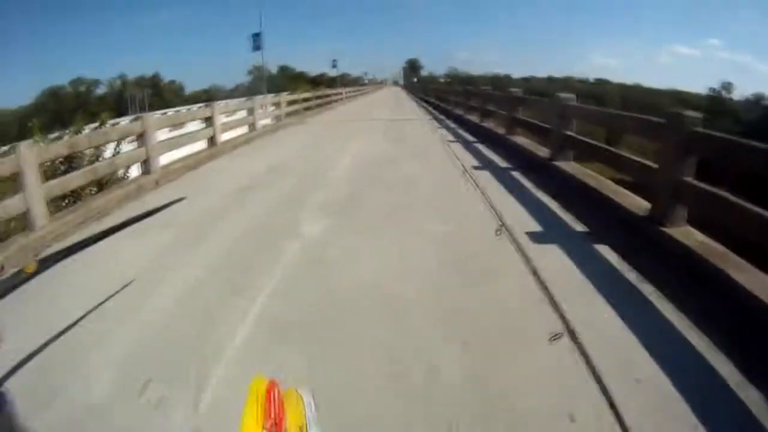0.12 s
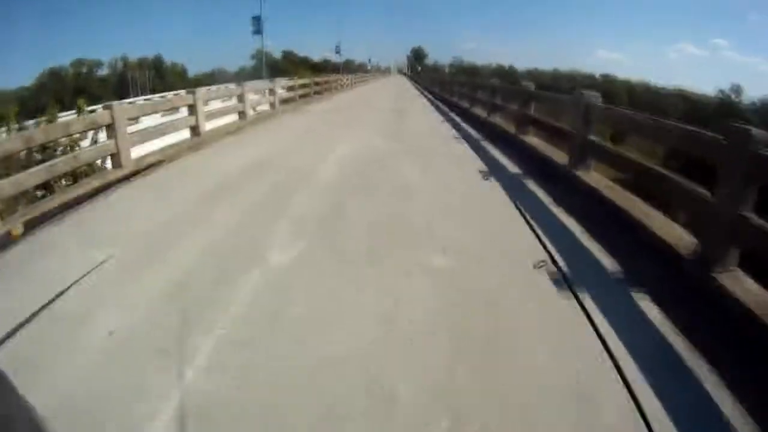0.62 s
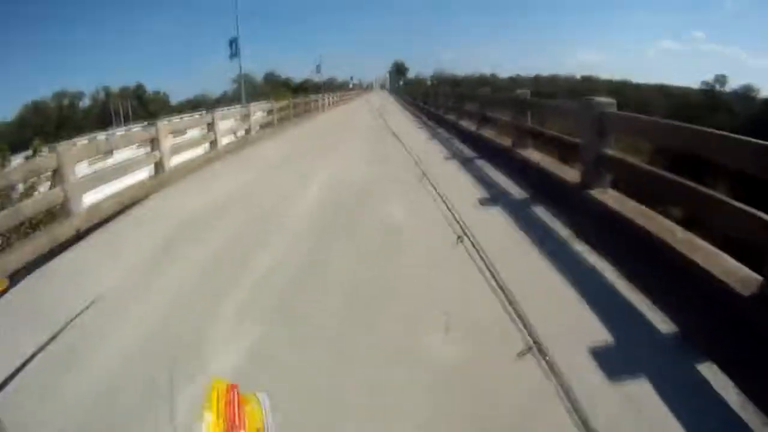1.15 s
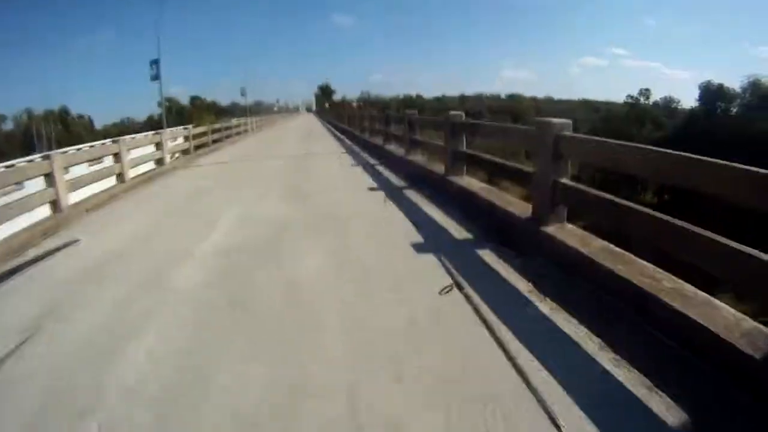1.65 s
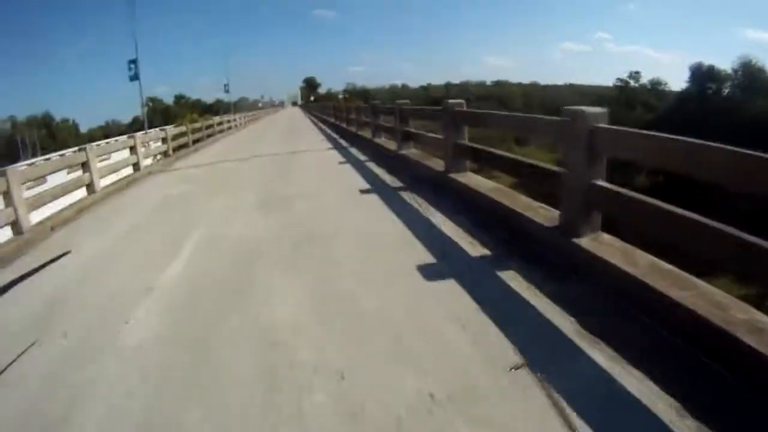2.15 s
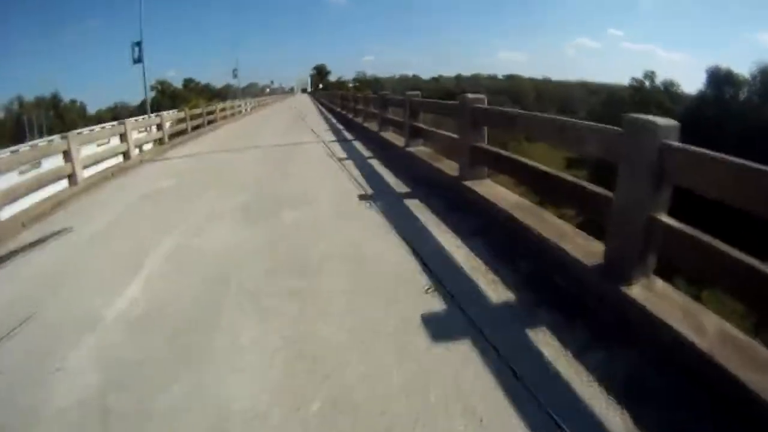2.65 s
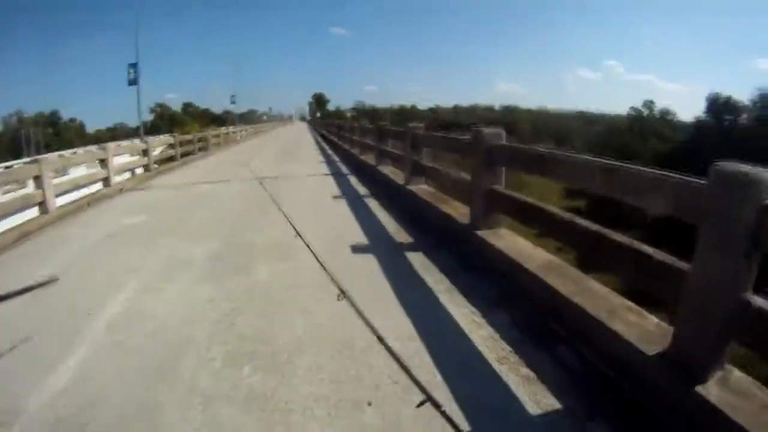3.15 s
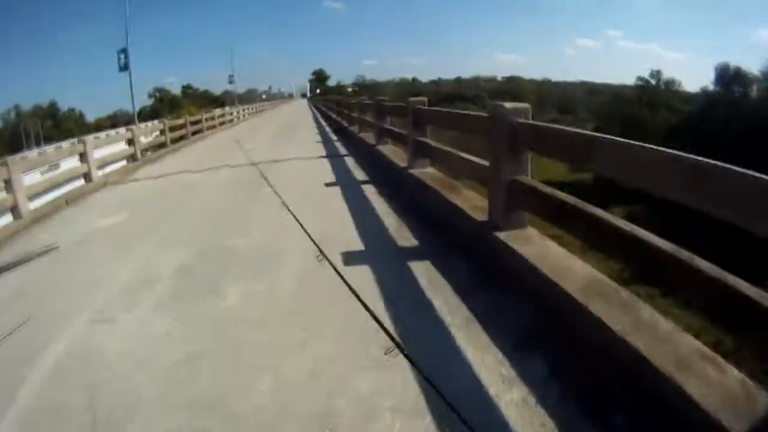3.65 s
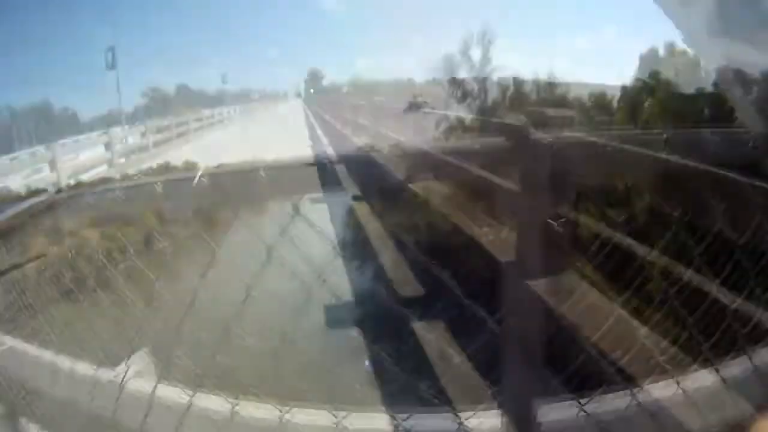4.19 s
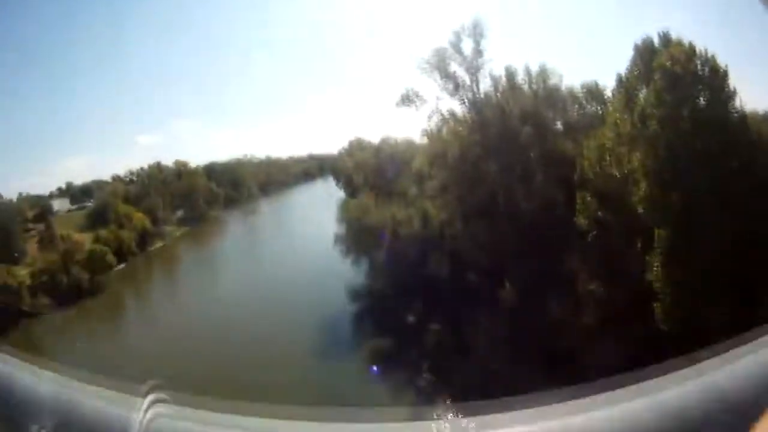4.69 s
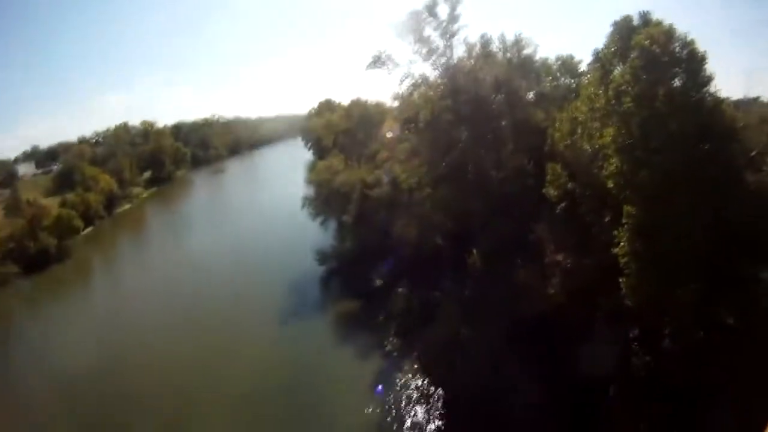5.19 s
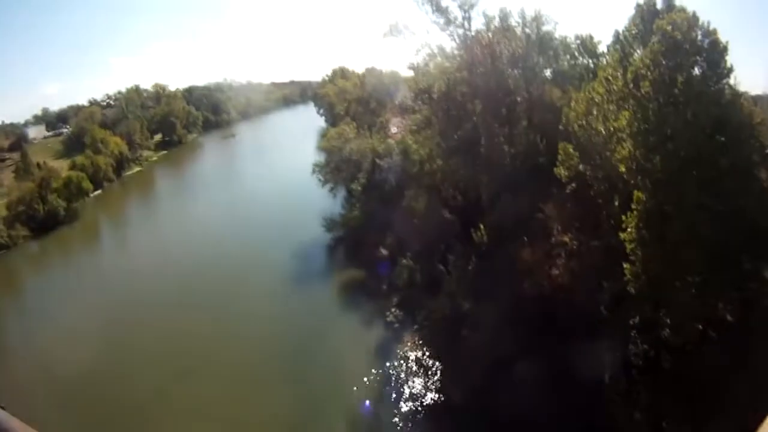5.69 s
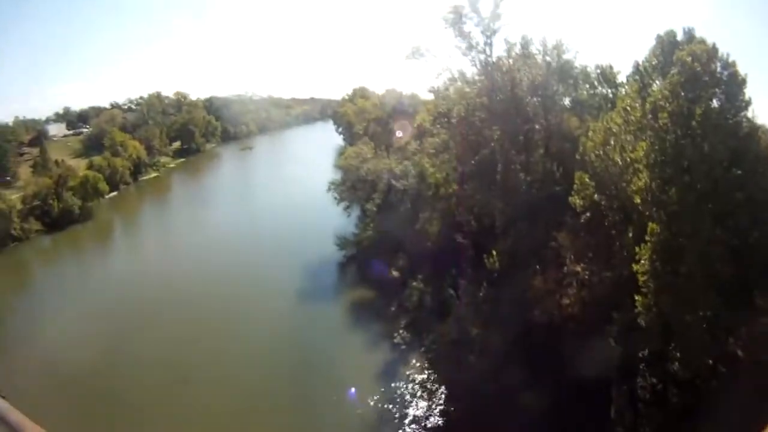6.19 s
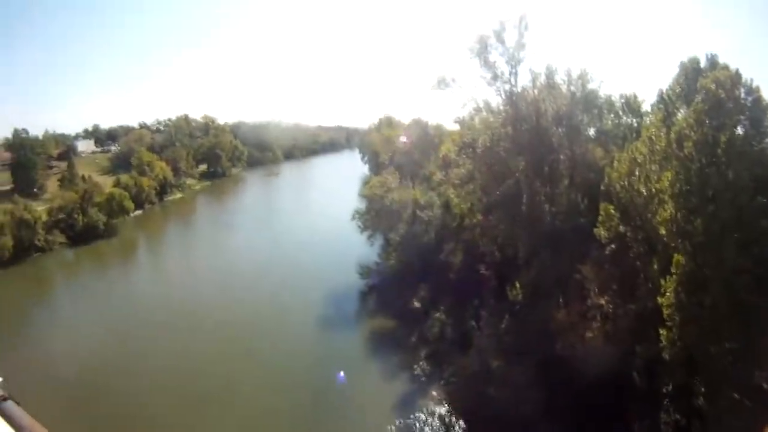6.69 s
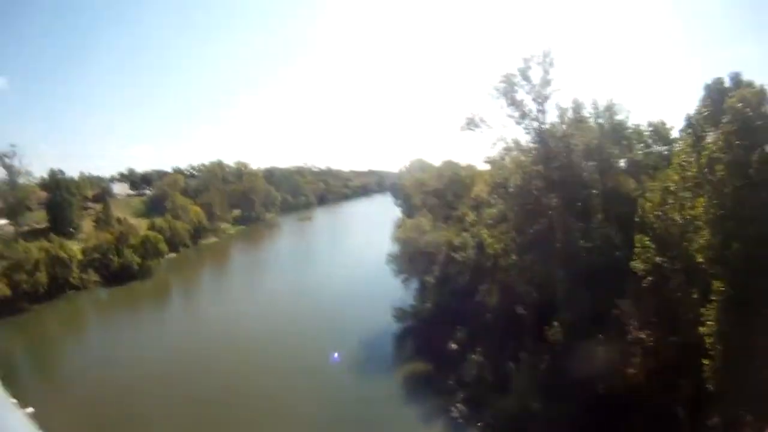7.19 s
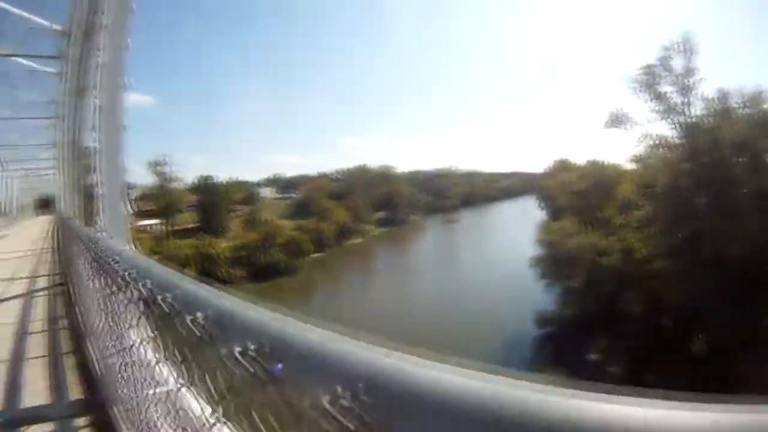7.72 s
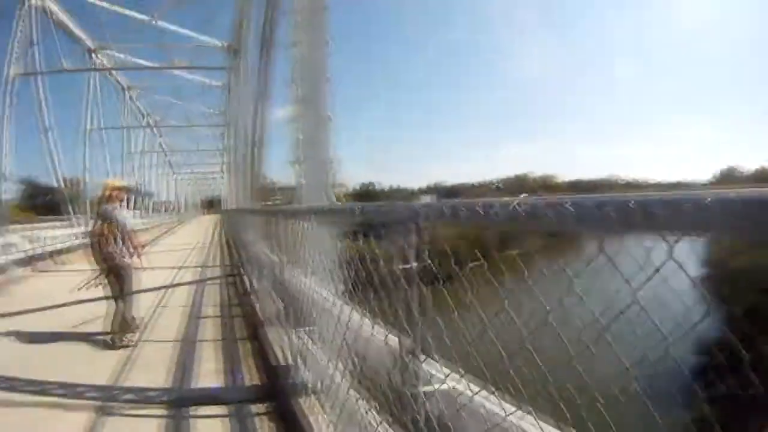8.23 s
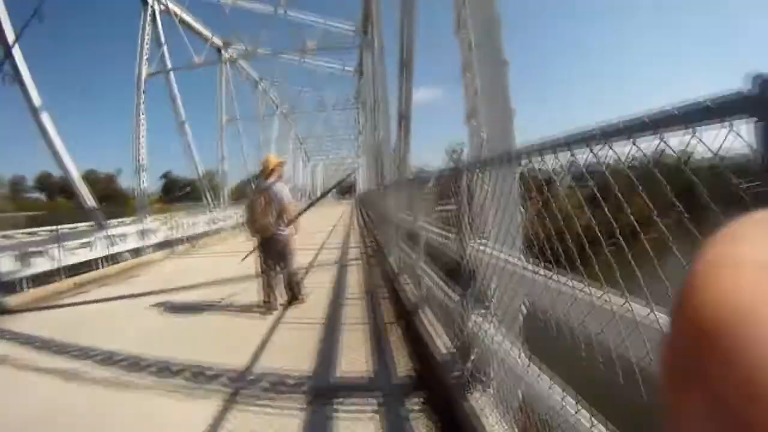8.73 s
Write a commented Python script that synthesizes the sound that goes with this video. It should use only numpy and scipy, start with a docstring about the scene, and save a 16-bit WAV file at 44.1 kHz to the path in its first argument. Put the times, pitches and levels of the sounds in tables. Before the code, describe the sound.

A walker's strap chafes a plastic camera case in short dry strokes, with low thumps about twice a second. A hand then seizes the case: one piercing knock, plastic clicks, creaks and deep rumble. The handling settles to quiet hiss with occasional dull bumps, before fingers and case clatter again at the end. The single microphone is inside the case, so everything is boxy, close and coarse, with little outdoor ambience.

```python
"""A bridge, crossed by a small camera in a sealed plastic case. First it rides on a strap that rubs
in strokes, a few to each step; then it is held by hand: fingers slide, the case creaks and knocks.
Rubbing is stick-slip noise and knocks are short pushes, both filtered by the resonances of the case.
Wind, footfalls and grip rumble in the bass as slowly varying noise, with single jolts as pulses.
The one microphone hears all of it through the case; the recorder samples slowly and holds each value."""
import sys
import numpy as np
from scipy import signal
from scipy.io import wavfile
from scipy.ndimage import uniform_filter1d

SR = 44100
rng = np.random.default_rng(int(sys.argv[2]) if len(sys.argv) > 2 else 0)


def volts(x):
    """Linear amplitude factor 10**(x/20) for a level x in dB, scalar or array-like."""
    e = np.asarray(x, float) / 20
    return 10 ** e


def wrap_up_sound(samples):
    """Save the sound to the file named by the first command line argument, as 16-bit audio."""
    columns = np.atleast_2d(samples).T
    # keep every value between -1 and 1, then stretch to whole-number steps
    tamed = np.clip(columns, -1, 1)
    steps = np.round(tamed * 32767).astype(np.int16)
    wavfile.write(sys.argv[1], SR, steps)


N = 390285

# resonances of the case: (frequency [Hz], width of one filter pass [Hz],
# gain under the strap [dB], gain in the hand [dB], gain when knocked [dB])
CASE_MODES = [(203, 137, -10.5, -7.5, 6), (312, 158, -8.5, -2.5, 7), (414, 180, -7.5, -0.5, 4),
              (557, 140, -1.5, -1, 4), (670.4, 75, -3.5, -0.5, 4.5), (780, 185, -4, -1.5, 0.5),
              (1033, 195, -6, -8.5, -2), (1267, 330, -2.5, -3, 0), (1507, 99, -4.5, -1, 3),
              (1740, 264, 0, -0.5, 2), (2020, 131, 2.5, 1, 7), (2250, 232, 0.5, 3, 4.5),
              (2420, 318, -6.5, -1.5, 3), (2840, 96, -5.5, -21.5, -12.5), (3080, 62, -36, -17.5, -18),
              (3458, 264, -6, -14, -13.5), (3944, 24, -37, -16, -39.5), (4630, 100, -18, -19.5, -21.5),
              (5060, 210, -21, -26.5, -41)]
MODE_HZ, MODE_WIDTH_HZ, STRAP_GAIN_DB, HAND_GAIN_DB, KNOCK_GAIN_DB = np.transpose(CASE_MODES)
LOW_HZ, HIGH_HZ = 1100, 2700  # borders between low, middle and high modes
# resonances of the hollow of the case: (frequency [Hz], width of one filter pass [Hz], gain [dB])
HOLLOW_MODES = [(59.9, 80, -4.5), (81.4, 47, -0.5), (100.5, 22, 3.5), (131.3, 32, -21)]


def ramp(table):
    """Linear interpolation: the columns after the time become curves at every sample."""
    s, *columns = np.transpose(table)
    return [np.interp(np.arange(N) / SR, s, column) for column in columns]


def unit(x):
    """Normalization of the mean power: scaled to rms 1."""
    return x / np.sqrt(np.mean(x ** 2))


def walk(rate):
    """Smoothed random process: levels held 1 / rate s and averaged twice, with a spread near 1."""
    hold = int(SR / rate)
    steps = np.repeat(rng.standard_normal(N // hold + 1), hold)
    slewed = uniform_filter1d(uniform_filter1d(steps, hold), hold)
    return 1.81 * slewed[:N]


def ring(x, hz, width, order=2):
    """Damped resonance: a second pass keeps the valleys between modes dark."""
    b, a = signal.iirpeak(hz, hz / width, fs=SR)
    for _ in range(order):
        x = signal.lfilter(b, a, x)
    return x


def case(push, gains_db, order=2, below_hz=np.inf):
    """Modal superposition: the case answers a push in three groups of modes: low, middle, high."""
    groups = np.zeros((3, len(push)))
    for k, (hz, width, db) in enumerate(zip(MODE_HZ, MODE_WIDTH_HZ, gains_db)):
        if hz < below_hz:
            group = int(hz > LOW_HZ) + int(hz > HIGH_HZ)
            # after a single pass, alternating signs let neighbours add up between their peaks
            sign = (-1) ** (k * order)
            groups[group] += sign * volts(db) * ring(push, hz, width, order=order)
    return groups


def friction(slips, spread, flicker_db):
    """Stick-slip: a flickering hiss with sparse slips (slips per second) of uneven size on top."""
    where, size, hiss = rng.random(N), rng.exponential(size=N), rng.standard_normal(N)
    slip_size = 8.0 * volts(spread * np.minimum(size, 3.0))
    slip = (where < slips / SR) * np.sign(hiss) * slip_size
    return volts(flicker_db * walk(60)) * (hiss + slip)


def strap(share):
    """Sliding friction: the strap creeps over the case all the time and drags hard in short strokes."""
    # strap lying on the case between strokes: (time [s], pressure as level of the middle modes [dB])
    creep_levels = [(0.0, -47.5), (0.4, -54), (1.05, -51.5), (1.27, -58), (1.97, -52.5), (2.4, -56),
                    (2.97, -47.5), (3.25, -56), (3.76, -56.5), (4.11, -41.5), (4.35, -46.5), (5.11, -45),
                    (5.7, -59)]
    # strokes of the strap, a few to each step: (time [s], length [ms], level of the middle modes [dB])
    strokes = [(0.081, 66, -48.5), (0.219, 18, -40.5), (0.284, 110, -42), (0.419, 64, -41),
               (0.495, 46, -49), (0.6, 27, -47), (0.635, 51, -39.5), (0.788, 65, -41), (0.9, 46, -52.5),
               (1.027, 38, -42.5), (1.137, 45, -47.5), (1.289, 26, -41), (1.32, 46, -47.5),
               (1.377, 49, -42.5), (1.49, 120, -51), (1.646, 69, -49), (1.841, 94, -43.5), (2.028, 13, -41),
               (2.08, 51, -49.5), (2.341, 55, -40.5), (2.424, 70, -45.5), (2.6, 39, -50), (2.723, 150, -52),
               (2.901, 84, -38.5), (3.126, 84, -45), (3.295, 54, -48), (3.437, 34, -41.5), (3.518, 47, -42),
               (3.672, 34, -47), (4.02, 42, -42), (4.24, 51, -44.5), (4.49, 188, -47.5), (4.75, 152, -54)]
    creep_low_db = -2.5
    middle_stroke_db, stroke_low_db, low_per_db = -45, -6.5, -0.14  # harder strokes are brighter

    level_db, = ramp(creep_levels)
    low, mid, high = case(friction(slips=130.0, spread=3.3, flicker_db=1.67), STRAP_GAIN_DB)
    creep = volts(creep_low_db) * unit(low) + (mid + high) / np.std(mid)
    out = share * volts(level_db) * creep

    low, mid, high = case(friction(slips=220.0, spread=1.85, flicker_db=0.2), STRAP_GAIN_DB)
    now_ms = np.arange(N) * 1000 / SR
    for s, ms, db in strokes:
        at = slice(max(int((s - 0.04) * SR), 0), int((s + 0.3) * SR))
        # the drag swells and lets go within some milliseconds
        rise = (now_ms[at] - 1000 * s) / 7.6
        fall = (1000 * s + ms - now_ms[at]) / 7.0
        low_db = stroke_low_db + low_per_db * (db - middle_stroke_db)
        rub = volts(low_db) * low[at] / np.std(low) + (mid + high)[at] / np.std(mid)
        out[at] += volts(db) * rub / (1 + np.exp(-rise)) / (1 + np.exp(-fall))
    return out


def sway():
    """Transient excitation: the body lurches at each footfall, exponentially up and down again."""
    # footfalls: (time of the peak [s], sway level [dB])
    footfalls = [(0.27, -45), (0.79, -49.5), (1.31, -44), (1.87, -49), (2.39, -51), (2.912, -47),
                 (3.47, -45)]
    rise_s, fall_s = 0.037, 0.11
    now = np.arange(N) / SR
    lurch = np.zeros(N)
    for s, db in footfalls:
        lurch += volts(db) * np.exp(np.minimum((now - s) / rise_s, (s - now) / fall_s))
    return lurch


def rumble(share):
    """Turbulent pressure: a deep sway, a boom ringing the hollow and, in the hand, a thrum between."""
    # swing of the hand-held camera: (time [s], rumble level ahead of the three shares below [dB])
    swing_levels = [(3.9, -45.5), (4.4, -34.5), (4.96, -36), (5.0, -46.5), (5.7, -52.5), (6.4, -59.5),
                    (6.9, -61), (7.5, -48.5), (8.1, -47.5), (8.5, -41), (8.85, -41)]
    swing, lurch = share * volts(ramp(swing_levels)[0]), sway()

    deep = unit(ring(rng.standard_normal(N), 25.0, 31.0)) * volts(2.0 * walk(11))
    air = rng.standard_normal(N) * volts(3.65 * walk(25))
    boom = unit(sum(volts(db) * ring(air, hz, width) for hz, width, db in HOLLOW_MODES))
    thrum = unit(ring(rng.standard_normal(N) * volts(2.4 * walk(15)), 66.0, 57.0))

    # the first term is the wind between footfalls
    deep *= volts(-66.5) + lurch + volts(-6) * swing
    boom *= volts(-57.5) + volts(-9.5) * lurch + volts(-7) * swing
    return deep + boom + volts(-5) * swing * thrum


def steady_hiss():
    """Stationary random noise: a broad resonance gives the hiss its colour."""
    return volts(-71) * unit(ring(rng.standard_normal(N), 1100.0, 5300.0))


def jolts():
    """Impulsive loading: each jolt swings the microphone membrane a cycle or so and kicks the hollow."""
    # jolts of footfalls and grip: (time of the peak [s], level ahead of the -4 dB shares [dB], pitch [Hz])
    jolt_list = [(0.222, -28, 91.5), (0.55, -34.5, 104), (1.299, -29, 59), (1.802, -35.5, 102),
                 (1.88, -40.5, 32), (2.861, -34.5, 102), (3.345, -40, 90), (3.77, -30, 93.7),
                 (3.805, -23.5, 104), (3.908, -35, 97), (4.005, -24, 125), (4.211, -22.5, 100),
                 (4.456, -21, 66), (4.811, -32, 31), (4.864, -35, 52), (4.96, -32, 34.4), (5.099, -28, 52),
                 (5.611, -30.5, 31), (5.995, -36, 32), (6.473, -31.5, 50), (7.207, -27.5, 50.7),
                 (7.478, -31, 58), (7.729, -25.5, 114), (8.136, -25, 96), (8.329, -29, 80),
                 (8.557, -26, 39.8), (8.69, -24.5, 110)]
    swing, kick, t = np.zeros(N + 4096), np.zeros(N + 4096), np.arange(-4096, 4096) / SR
    for s, db, hz in jolt_list:
        at = slice(int(s * SR) - 4096, int(s * SR) + 4096)
        swing[at] += volts(db) * np.cos(2 * np.pi * hz * t) * np.exp(-(t * hz / 0.71) ** 2)
        kick[at] += volts(db) * np.exp(-((t + 0.0051) / 0.0043) ** 2)  # leads the swing by 5.1 ms
    boom = sum(volts(db) * ring(kick[:N], hz, width, order=1) for hz, width, db in HOLLOW_MODES)
    return volts(-4.0) * swing[:N] + volts(-4.0) * boom


def favour(hz, db, spread):
    """Selective excitation: the spot that is touched lifts the modes near one pitch."""
    return db * np.exp(-(np.log(MODE_HZ / hz) / spread) ** 2)


def knocks():
    """Impact: a first touch, then a rough contact; long ones start softly, short ones crack."""
    # knocks and ticks: (time [s], peak of the middle modes [dB], favoured pitch [Hz],
    # peak of the low modes over the middle ones [dB], contact time [ms])
    knock_list = [(0.219, -32, 2100, -6, 5.8), (1.293, -32, 2270, -9, 3.2), (1.386, -30.5, 2050, -23, 7.6),
                  (1.653, -32.5, 2350, -18, 2.7), (3.43, -44, 2200, 5, 10), (3.755, -55, 490, 11, 17),
                  (3.795, -46, 620, 6.5, 11), (3.831, -31, 1350, -4.5, 2), (3.9485, -20.5, 1380, -16, 1.4),
                  (3.964, -31, 2200, -8, 2), (3.9721, -1, 1550, -8.5, 2.7), (3.98, -14, 2200, -7.5, 2),
                  (4.0012, -13, 1840, -8, 1.9), (4.095, -28.5, 1740, -9, 2), (4.165, -18, 3350, -15, 2.6),
                  (4.182, -40, 700, 1, 2.3), (4.2141, -16, 1830, -6, 3.1), (4.2301, -16.5, 2370, -9.5, 2),
                  (4.29, -31, 1940, 2, 6.8), (4.39, -15, 1350, -1.5, 2.5), (4.42, -31, 1240, 1, 2.2),
                  (4.4515, -34.5, 590, 10, 3), (4.457, -16, 3230, -26, 1.8), (4.505, -26, 2250, -12, 12),
                  (4.619, -38, 700, 7.5, 7), (4.915, -35.5, 2250, 8.5, 3.8), (4.93, -10.5, 2360, -13, 0.93),
                  (4.954, -31.5, 980, 1, 5.9), (4.979, -29, 1970, -22, 1.7), (5.1139, -23, 2240, -21, 3.6),
                  (5.278, -32.5, 1290, 1, 5.9), (5.299, -32, 2270, -3.5, 4.7), (5.605, -48, 2020, 9, 9.4),
                  (5.76, -48.5, 2080, 8.5, 10.5), (6.28, -58, 2610, 14, 9.4), (6.619, -45.5, 1300, -2, 15),
                  (6.73, -48, 1570, 7, 8.3), (6.98, -44.5, 2160, 2.5, 6.3), (7.192, -27, 2110, -8.5, 4.1),
                  (7.227, -29, 2090, -6, 6.9), (7.352, -45.5, 780, 9.5, 4.2), (7.47, -52.5, 2340, 11.5, 11),
                  (7.705, -44.5, 2400, 10, 6.1), (7.72, -29.5, 610, 8, 0.72),
                  (8.118, -45.5, 866, 19.5, 7.4), (8.246, -52, 785, 13, 18), (8.39, -37, 1330, -2, 4.3),
                  (8.4385, -31.5, 590, 5, 3.7), (8.5239, -14, 1810, -8.5, 4.4),
                  (8.5365, -15, 2420, -10, 5.3), (8.622, -14.5, 2210, -11, 3.7), (8.635, -41, 700, 9, 12),
                  (8.6761, -17.5, 2720, -3, 2.9), (8.697, -30, 2050, 6.5, 1.8),
                  (8.712, -19.5, 2160, -4, 3.9), (8.734, -40.5, 2200, 11, 2.5),
                  (8.7762, -32, 625, 5.5, 2.5), (8.7868, -20.5, 2250, -0.5, 3.1), (8.8, -31, 2150, -8, 27)]
    length = 3072
    out, t = np.zeros(N + length), np.arange(length) / SR
    grits = rng.standard_normal((len(knock_list), length))
    for (s, db, bright_hz, low_db, ms), grit in zip(knock_list, grits):
        u = t * 1000 / max(ms, 0.3)  # time in contact lengths
        contact = grit * (1 - np.exp(-u / 0.26)) * np.exp(-u ** 1.1)
        touch = 10.2 / ms * np.exp(-t / 0.0001)
        push = ring(contact - touch, 1465.0, 5500.0)

        spread = 0.11 if bright_hz > LOW_HZ else 0.25  # a thud presses a broad patch
        groups = case(push, KNOCK_GAIN_DB + favour(bright_hz, db=12.0, spread=spread), order=1)
        # high modes over the middle ones: for a thud, a dull and a sharp knock
        high_db = np.interp(bright_hz, [900, 1650, 2520], [-10, -17, 0])
        gains = volts(db + np.array([low_db, 0, high_db])) / np.abs(groups).max(axis=1)
        start = int(s * SR)
        out[start:start + length] += gains @ groups
    return out[:N]


def hand(share):
    """Stick-slip in the hand: fingers slide in the treble, the shifting grip bumps the low modes."""
    # the hand: (time [s], fingers sliding, middle modes [dB], grip shifting, low modes [dB])
    hand_levels = [(3.68, -78, -72), (3.77, -69, -50), (3.81, -43.5, -42.5), (3.91, -53, -53),
                   (4.03, -50, -46), (4.11, -50, -43.5), (4.29, -51, -45.5), (4.52, -44.5, -47),
                   (4.7, -50.5, -48.5), (4.9, -54.5, -49), (5.09, -50, -51), (5.58, -54.5, -53),
                   (5.69, -59.5, -61), (6.93, -58.5, -61.5), (7.5, -56, -53.5), (8.49, -52, -50),
                   (8.63, -54.5, -52), (8.75, -50.5, -45.5), (8.85, -43, -43.5)]
    slide_db, grip_db = ramp(hand_levels)
    high_db = -60.5 + 1.2 * (slide_db + 50)  # high modes grow faster than the slide
    _, mid, high = case(friction(slips=140.0, spread=2.7, flicker_db=1.06), HAND_GAIN_DB)
    grip_rub = friction(slips=60.0, spread=5.1, flicker_db=2.5)
    low = case(grip_rub, HAND_GAIN_DB, below_hz=LOW_HZ)[0]
    slide = volts(slide_db) * unit(mid) + volts(high_db) * unit(high)
    return share * (slide + volts(grip_db) * unit(low))


def scene():
    """Superposition of all sources: the strap ride gives way to the hand-held view."""
    now = np.arange(N) / SR
    grip = np.interp(now, [3.7, 4.25], [0, 1])  # the hand closes on the case
    slack = np.interp(now, [3.85, 4.55], [0, 1])  # the strap slackens
    mono = strap(1 - slack ** 0.5) + rumble(grip ** 0.38) + steady_hiss()
    mono = mono + jolts() + knocks() + hand(grip ** 0.48)
    return np.array([mono, mono])


def roll_off(x):
    """The treble ends steeply here."""
    return signal.sosfilt(signal.butter(12, 16470, fs=SR, output="sos"), x)


def record(dry):
    """Sample and hold: 12000 values a second, held flat, mirror the sound around 6 and 12 kHz."""
    rounded = 0.55 * np.tanh(dry / 0.55)  # loud peaks saturate softly
    slow = signal.resample_poly(rounded, up=40, down=147, axis=1)
    steps = np.repeat(slow, 4, axis=1)  # 48000 samples a second
    held = signal.resample_poly(steps, up=147, down=160, axis=1)[:, :N]
    # each channel carries its own trace of noise
    noisy = held + volts(-77.5) * rng.standard_normal(held.shape)
    lowpass = signal.ellip(8, 0.3, 36.0, 15350, fs=SR, output="sos")
    mix = signal.sosfilt(lowpass, noisy)
    return roll_off(mix)


dry = scene()
out = record(dry)
wrap_up_sound(out)
```